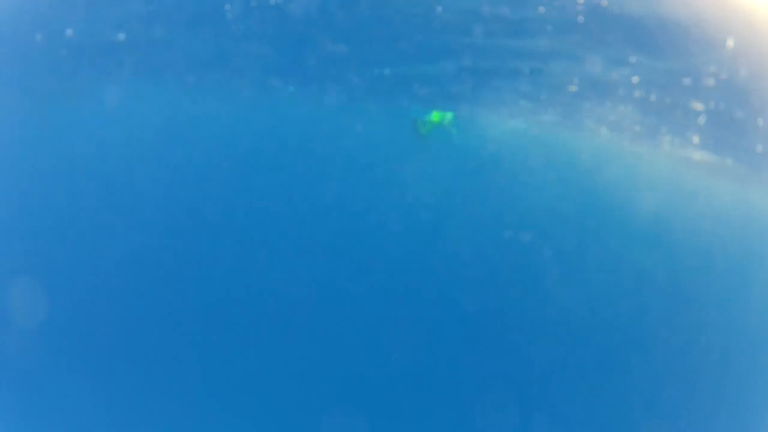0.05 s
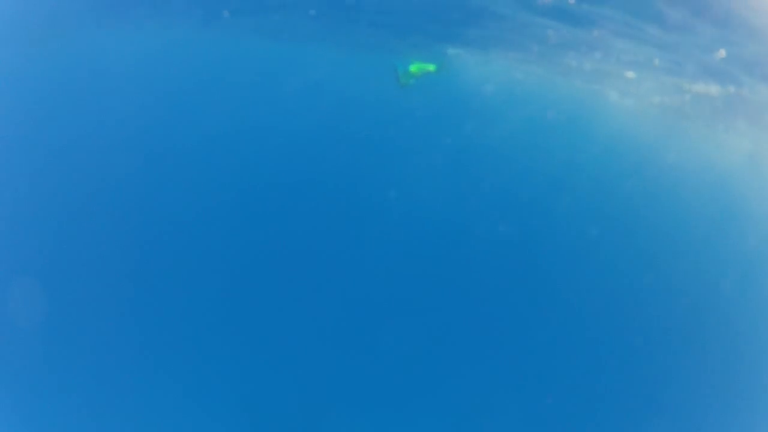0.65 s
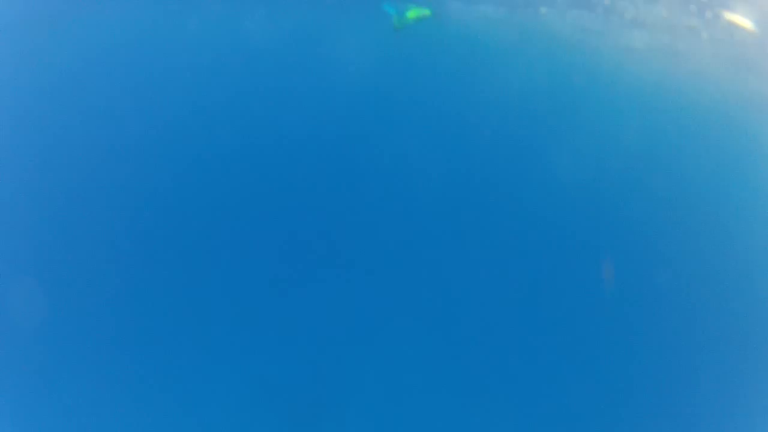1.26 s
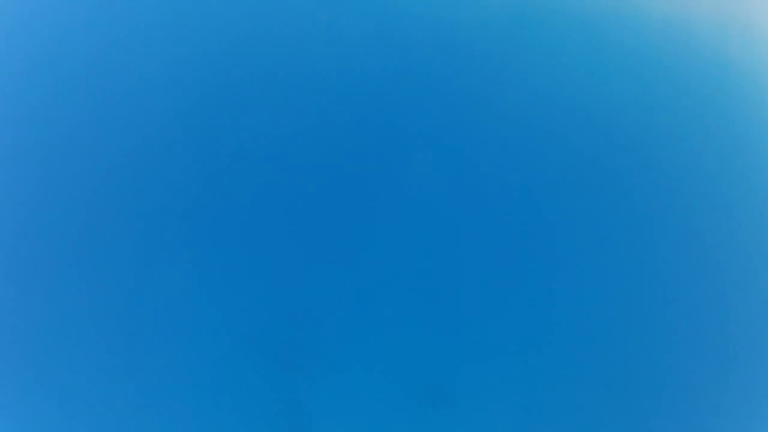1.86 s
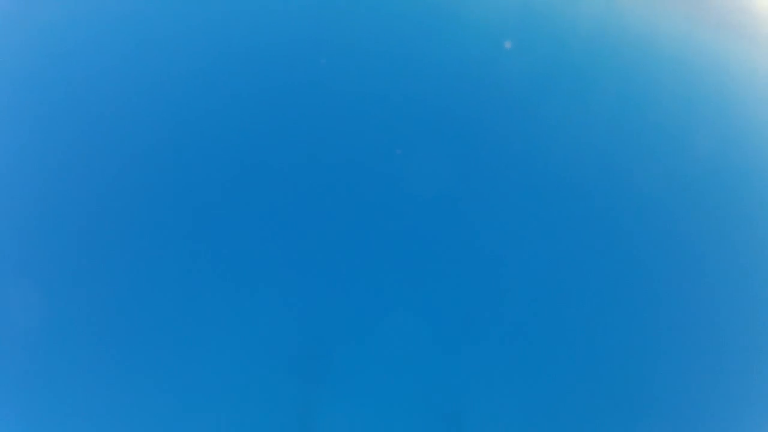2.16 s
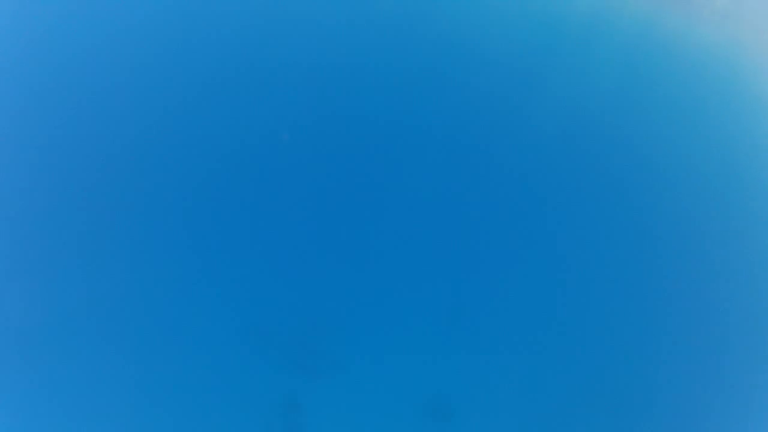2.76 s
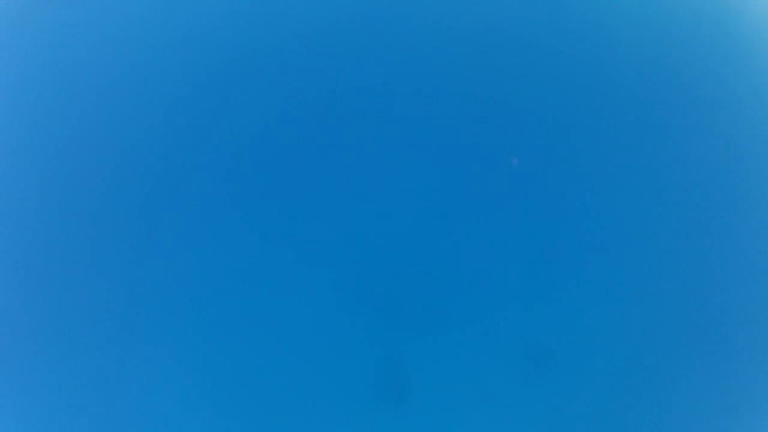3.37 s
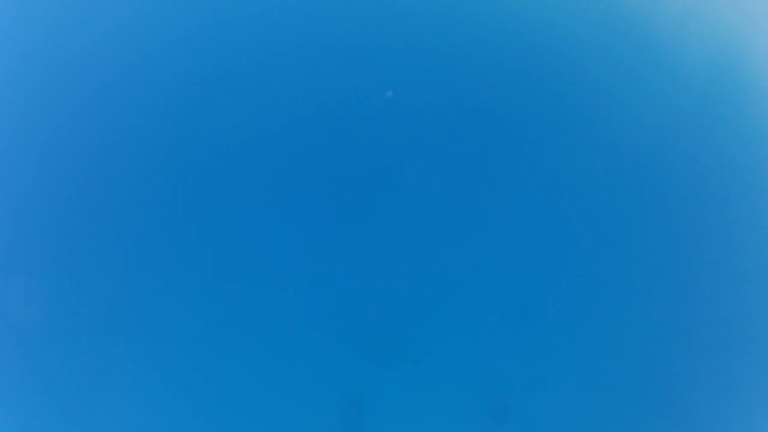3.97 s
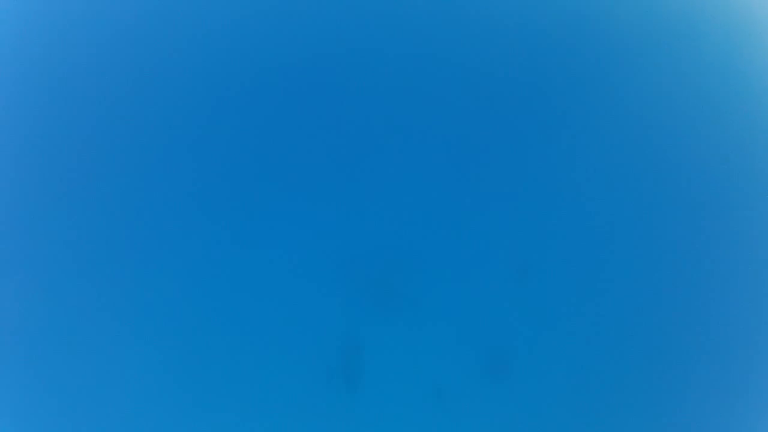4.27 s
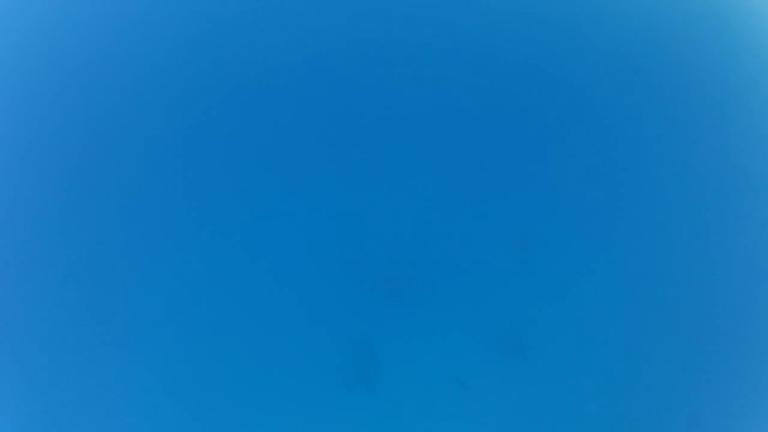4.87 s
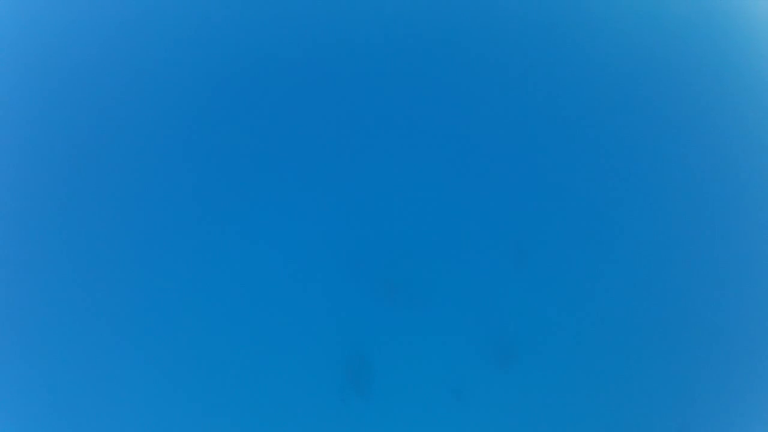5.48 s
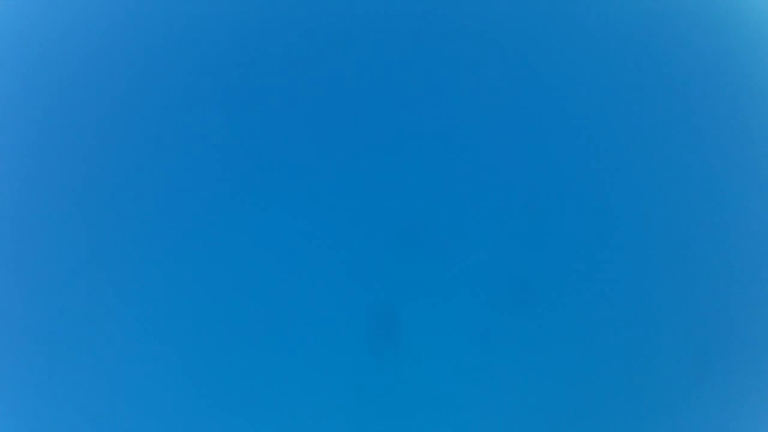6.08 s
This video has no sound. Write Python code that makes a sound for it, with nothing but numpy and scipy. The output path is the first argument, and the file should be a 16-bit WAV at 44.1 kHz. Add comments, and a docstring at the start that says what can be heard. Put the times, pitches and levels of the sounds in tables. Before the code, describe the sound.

Heard from inside a small sealed camera moving under the sea, it opens quietly with a few plinking bubbles and two faint, thin squeaks, probably from a tether. From 0.6 seconds water surges in, a low churning rumble with a hollow ring from the housing, tiny bubble snaps and a cluster of dull thuds at about 1.3 seconds. As it ebbs, light ticks run from 1.6 seconds and crowd into a short creak around 2 seconds. The next surge brings a sharp knock and close glugs at 2.4 to 2.7 seconds. The flow fades, with more ticks near 3.6 seconds, then returns with bubbles and small knocks between 3.8 and 4.4 seconds. From 4.5 seconds the water becomes a brighter, steadier rush, with one short high pip at 4.8, lasting until about 6 seconds. A thin digital sheen colours the treble throughout.

```python
"""A small sealed camera is drawn along under the sea. In an opening lull bubbles plink and the tether,
most likely, squeaks. From 0.6 s surges churn and ring the housing; eddies thud on the shell. As the
first ebbs the tether ticks, then creaks near 2 s as the pull returns. A knock and close glugs come in
the next surge, and more ticks follow its ebb. From 4.5 s the water turns into a brighter rush.
Throughout, the recorder holds each sample, which mirrors the sound into the treble."""
import sys
import numpy as np
from scipy import signal
from scipy.fft import rfft, irfft, next_fast_len
from scipy.io import wavfile
from scipy.ndimage import map_coordinates

SR = 44100
rng = np.random.default_rng(int(sys.argv[2]) if len(sys.argv) > 2 else 0)


def persist_wave(psi):
    """Save psi, clipped to +-1, as 16-bit WAV."""
    counts = np.round(np.clip(psi, -1, 1) * 32767).astype(np.int16)
    wavfile.write(sys.argv[1], SR, np.atleast_2d(counts).T)


N = 270333
TIME = np.arange(N) / SR

# tether squeaks, one curve each: t/s, f/Hz, relative level/dB
SQUEAK_CURVES = [
    [(.047, 1145, -58), (.050, 1145, -48.5), (.062, 1253, -48), (.08, 1264, -57.5), (.105, 1410, -60),
     (.12, 1370, -70)],
    [(.228, 1207, -64), (.238, 1194, -50), (.255, 1306, -52), (.28, 1286, -51), (.297, 1290, -59),
     (.308, 1240, -60)],
]
# squeak spectrum: harmonic number, relative level/dB
SQUEAK_HARMONICS = [(1, -4.5), (2, -1), (3, 4.5), (4, -12.5)]
# tether mount: f/Hz, relative level/dB, t60/s
MOUNT_MODES = [(720, -1.5, 0.024), (1160, -2.5, .013), (1444, -2, 0.012), (1980, -4.5, .009),
               (2610, -7, 0.0071), (3720, -11, 0.0073), (5340, -19.5, 0.0046)]
# runs of tether slips: first level/dB, tilt/(dB/octave), t/s of each slip
SLIP_RUNS = [(-37.5, 0.5, (1.6168, 1.6646, 1.6965, 1.7242, 1.7514, 1.779, 1.809, 1.8432, 1.8826, 1.9422)),
             (-39, -1, (3.5328, 3.576, 3.6187, 3.6522, 3.6925, 3.7293))]
# tether creak: t/s, slip rate/Hz, relative level/dB
CREAK_CURVE = [(1.97, 56, -60), (2.0, 75, -42), (2.06, 130, -42), (2.12, 122, -48), (2.18, 170, -44.5),
               (2.25, 120, -56)]
# collapsing minute bubbles: t/s, f/Hz, level/dB
BUBBLE_SNAPS = [(.7407, 5340, -44.5), (.861, 5100, -39.5), (0.93, 4600, -45), (1.332, 4630, -49),
                (3.7712, 4920, -40), (3.8385, 3700, -47.5), (3.9592, 4570, -34.5)]
# large bubbles: t/s, f/Hz, level/dB
LARGE_BUBBLES = [(0.049, 2240, -42), (.336, 3200, -53.5), (0.386, 1197, -39.5), (0.429, 2320, -47),
                 (0.454, 2707, -50.5), (0.4666, 1804, -37.5), (0.547, 1210, -43.5), (2.389, 1544, -32),
                 (2.426, 2670, -37.5), (2.4312, 1100, -21.5), (2.457, 2030, -33), (2.4545, 1210, -39),
                 (2.468, 3500, -44), (2.48, 2700, -50), (2.607, 1880, -38), (2.6107, 3280, -48),
                 (2.6351, 1172, -30), (2.636, 639, -20.5), (2.668, 2430, -44.5), (2.699, 1530, -45),
                 (3.7712, 2060, -40), (3.785, 2510, -41), (3.789, 1180, -35), (3.802, 1420, -37),
                 (3.8112, 2050, -37.5), (3.962, 2180, -37), (3.9985, 3580, -43), (4.0105, 1900, -35),
                 (4.052, 644, -28.5), (4.213, 1830, -37)]
# swarms of tiny bubbles: t/s, spread/s, typical level/dB
BUBBLE_SWARMS = [(.42, 0.048, -56), (.56, 0.014, -56), (.8, .04, -52), (2.25, .1, -58), (2.465, 0.018, -55),
                 (2.635, 0.033, -51), (3.08, .08, -62), (3.8, 0.016, -61), (4.049, 0.038, -49)]
# short thuds, a sharp knock, a glug and a high pip: t/s, f/Hz, level/dB, rise/s
THUDS_AND_BLIPS = [(1.2855, 430, -21, 0.0019), (1.324, 477, -26.5, 0.0021), (1.334, 277, -22, 0.0017),
                   (1.339, 114, -26.5, 0.0073), (2.154, 218, -29.5, 0.0076), (2.4296, 394, -17, 0.00028),
                   (2.4304, 647, -18.5, 0.0014), (3.802, 610, -32.5, 0.0022), (4.061, 670, -28, 0.0024),
                   (4.351, 464, -28, 0.00098), (4.428, 200, -23, .00067), (4.8194, 1955, -28, 0.0013)]
# surges: full-flow t/s, slackening t/s, first level/dB, last level/dB
FLOW_SURGES = [(-.1, 0.007, -47, -49), (0.556, 1.471, -40.5, -39.5), (2.165, 3.384, -42.5, -52),
               (3.872, 4.552, -42, -39.5), (4.8, 6.13, -46, -45)]
# rumble swells and dips from passing eddies: t/s, half-width/s, gain/dB
EDDY_SWELLS = [(.88, 0.11, 6), (1.32, .11, 7.5), (1.75, 0.17, 9.5), (3.05, 0.17, 8), (4.05, 0.26, -3.5),
               (4.58, 0.066, 5), (5.36, 0.084, -27)]
# fast rush: t/s, level/dB
RUSH_CURVE = [(0, -59.5), (3.7, -56.5), (4.28, -59.5), (4.5, -46), (5.2, -43), (6.13, -42)]
# water noise spectra: f/Hz, relative density/dB
SWAY_SPECTRUM = [(10, -26), (24, -17), (31, 7.5), (38, 7), (46, 8), (56, -19), (75, -0.5), (120, -23),
                 (400, -38.5)]
BUFFET_SPECTRUM = [(35, -9), (62, -7.5), (90, -2), (110, 3.5), (128, 4.5), (160, -6), (220, -14.5),
                   (500, -63)]
CHURN_SPECTRUM = [(60, -26), (130, -7), (175, -0.5), (245, 1), (300, -2.5), (400, -2.5), (470, -2.5),
                  (550, -1.5), (690, -11), (1000, -44), (3000, -60)]
HISS_SPECTRUM = [(100, 17.5), (800, -6.5), (1100, -25), (2000, 9), (3000, -11.5), (4000, -4.5), (5900, -30)]
# housing modes in slow and fast flow: f/Hz, half-width/Hz, relative level/dB
SLOW_FLOW_MODES = [(599.7, 31, 4), (858, 30, -23), (1050, 44, -30.5), (1215, 47, -23.5), (1504, 48, -27.5),
                   (1788, 49, -17.5), (1900, 133, -24.5), (2480, 170, -41.5), (3580, 450, -47.5)]
FAST_FLOW_MODES = [(342, 35, 3), (510, 86, 3), (655, 49, 6.5), (795, 56, 2), (1195, 66, -6.5),
                   (1555, 31, -15), (2014, 150, -9), (2545, 200, -16.5), (3544, 380, -20), (4930, 640, -29)]


def amp(db):
    """Decibels to gain."""
    return 10 ** (np.asarray(db) / 20)


def unit(x):
    """Scale to rms 1."""
    return x / np.sqrt(np.mean(x ** 2) + 1e-20)


def curves(rows):
    """Per-sample values of each column after the time."""
    times_s, *columns = np.transpose(rows)
    return [np.interp(TIME, times_s, column) for column in columns]


def during(rows):
    """True between a curve's first and last row."""
    return (TIME > rows[0][0]) & (TIME < rows[-1][0])


def wobble(rate_hz):
    """Smooth random curve, knots at rate_hz."""
    return map_coordinates(rng.standard_normal(int(N * rate_hz / SR) + 4), [TIME * rate_hz])


def colour(points):
    """Response through (f/Hz, level/dB) points, log frequency axis."""
    knots_hz, db = np.transpose(points)
    return lambda hz: amp(np.interp(np.log(hz + 1), np.log(knots_hz), db))


def resonances(modes):
    """Response of steep-sided modes, summed in power."""
    return lambda hz: np.sqrt(sum((amp(db) / (1 + ((hz - centre_hz) / width_hz) ** 2)) ** 2
                                  for centre_hz, width_hz, db in modes))


def filtered(x, response):
    """Apply a frequency response."""
    size = next_fast_len(N + SR // 2)
    return irfft(rfft(x, size) * response(np.fft.rfftfreq(size, 1 / SR)), size)[:N]


def add(track, at_s, sound):
    """Mix a sound into a track."""
    part = track[max(round(at_s * SR), 0):][:len(sound)]
    part += sound[:len(part)]


def squeaks(chatter_hz=225, chatter_depth=0.61, jitter=0.014, rasp_rad=0.78):
    """Very fast stick-slip: a thin, rasping tone chopped by slower chatter."""
    track = np.zeros(N)
    for rows in SQUEAK_CURVES:
        hz, db = curves(rows)
        phase = 2 * np.pi * np.cumsum(hz * (1 + jitter * wobble(600))) / SR
        # uneven grip smears each harmonic separately
        tone = sum(amp(harmonic_db) * np.sin(k * phase + rasp_rad * wobble(900))
                   for k, harmonic_db in SQUEAK_HARMONICS)
        chatter_phase = 2 * np.pi * np.cumsum(chatter_hz * (1 + 0.052 * wobble(45))) / SR
        chatter = 1 + chatter_depth * np.sin(chatter_phase)
        track += amp(db - 5) * during(rows) * chatter * unit(tone)
    return track


def slip(db, tilt_db_per_oct, vary_db=1.5, detune=0.026, rebound=0.77, rebound_s=0.00183):
    """A tether jerk rings the mount at random mode strengths, then rebounds once."""
    t = np.arange(SR // 30) / SR
    hz, mode_db, t60_s = np.transpose(MOUNT_MODES)[:, :, None]
    mode_db = mode_db + tilt_db_per_oct * np.log2(hz / 1500) + vary_db * rng.standard_normal(hz.shape)
    phase = 2 * np.pi * hz * (1 + detune * rng.standard_normal(hz.shape)) * t
    sign = (-1) ** np.arange(len(MOUNT_MODES))[:, None]  # opposed neighbours: one dry, broad click
    ring = amp(db) * np.sum(sign * amp(mode_db - 60 * t / t60_s) * np.sin(phase), 0)
    delay_s = rebound_s * rng.uniform(0.494, 1.5)
    return ring + rebound * np.interp(t - delay_s, t, ring, left=0)


def ticks(fade_db_per_doubling=2.5):
    """Single slips as the flow ebbs, weakening with their count."""
    track = np.zeros(N)
    for first_db, tilt_db_per_oct, times_s in SLIP_RUNS:
        for count, at_s in enumerate(times_s, 1):
            add(track, at_s, slip(first_db - fade_db_per_doubling * np.log2(count), tilt_db_per_oct))
    return track


def creak():
    """Light slips crowd together as the pull returns."""
    track = np.zeros(N)
    rate_hz, db = curves(CREAK_CURVE)
    slip_count = np.cumsum(rate_hz * amp(0.75 * wobble(50)) * during(CREAK_CURVE)) / SR
    for sample in np.flatnonzero(np.diff(np.floor(slip_count))):
        add(track, sample / SR, slip(db[sample] - 9.5, tilt_db_per_oct=6.0, rebound=0.3))
    return track


def bubble(hz, db, t60_s, glide=0.036, attack_cycles=0.41, tear_db=-11, tear_s=0.0021):
    """The neck tears with a noise burst; the bubble rings, pitch creeping up."""
    t = np.arange(SR // 6) / SR
    cycles = hz * (t + glide * t ** 2 / (2 * t60_s))
    ring = amp(-60 * t / t60_s) * (1 - np.exp(-cycles / attack_cycles)) * np.sin(2 * np.pi * cycles)
    band = signal.butter(2, [0.45 * hz, 1.2 * hz], "band", fs=SR, output="sos")
    tear = unit(signal.sosfilt(band, rng.standard_normal(len(t))))
    return amp(db) * (ring + amp(tear_db) * tear * np.exp(-t / tear_s))


def snaps():
    """Minute bubbles collapse: high clicks, hardly any ring."""
    track = np.zeros(N)
    for at_s, hz, db in BUBBLE_SNAPS:
        add(track, at_s, bubble(hz, db, t60_s=0.0076))
    return track


def bubbles(swarm_hz=2600, scatter=0.324, max_hz=4200, t60_cycles=40, per_swarm=16):
    """Large single bubbles and swarms of tiny ones; lower ones ring longer."""
    track = np.zeros(N)
    for at_s, hz, db in LARGE_BUBBLES:
        add(track, at_s, bubble(hz, db, t60_s=0.078 * (hz / 1000) ** -0.94))
    for at_s, spread_s, db in BUBBLE_SWARMS:
        for offset, pitch, strength in rng.standard_normal((per_swarm, 3)):
            hz = min(swarm_hz * np.exp(scatter * pitch), max_hz)
            add(track, at_s + spread_s * offset, bubble(hz, db + 2 * strength, t60_cycles / hz))
    return track


def thuds_and_blips():
    """Short thuds, a sharp knock, a glug and a high pip: tones that swell and die quickly."""
    track = np.zeros(N)
    t = np.arange(SR // 10) / SR
    for at_s, hz, db, rise_s in THUDS_AND_BLIPS:
        envelope = t / rise_s * np.exp(1 - t / rise_s)
        add(track, at_s, -amp(db) * envelope * np.sin(2 * np.pi * hz * t))
    return track


def turbulence(response, lump_db, lump_hz):
    """Lumpy noise driving a response; rms 1."""
    drive = rng.standard_normal(N) * amp(lump_db * wobble(lump_hz))
    return unit(filtered(drive, response))


def surges_db(rise_db_per_s=96, ebb_db_per_s=36.5, lull_db=-66.0):
    """Flow level: each surge builds fast, holds with a drift, ebbs slowly."""
    flow_db = np.full(N, lull_db)
    for full_s, slack_s, first_db, last_db in FLOW_SURGES:
        held_db = np.interp(TIME, [full_s, slack_s], [first_db, last_db])
        rise_db = rise_db_per_s * np.minimum(TIME - full_s, 0)
        ebb_db = ebb_db_per_s * np.maximum(TIME - slack_s, 0)
        flow_db = np.maximum(flow_db, held_db + rise_db - ebb_db)
    return flow_db


def water(buffet_db=-4.5, churn_db=-3, churn_swell_share=0.41, ring_db=0.5, sway_db=-55.5, hiss_db=-59):
    """Flow buffets, churns and rings the housing, with slow sway, a late rush and faint hiss."""
    flow_db = surges_db()
    swell_db = sum(db * np.exp(-((TIME - at_s) / width_s) ** 2) for at_s, width_s, db in EDDY_SWELLS)
    rush_db, = curves(RUSH_CURVE)
    buffet_gain = amp(flow_db + buffet_db + swell_db)
    churn_gain = amp(flow_db + churn_db + churn_swell_share * swell_db)
    sway = amp(sway_db) * unit(filtered(rng.standard_normal(N), colour(SWAY_SPECTRUM)))
    buffet = buffet_gain * turbulence(colour(BUFFET_SPECTRUM), lump_db=0.8, lump_hz=79)
    churn = churn_gain * turbulence(colour(CHURN_SPECTRUM), lump_db=2.0, lump_hz=150)
    ring = amp(flow_db + ring_db) * turbulence(resonances(SLOW_FLOW_MODES), lump_db=1.0, lump_hz=150)
    rush = amp(rush_db) * turbulence(resonances(FAST_FLOW_MODES), lump_db=2.0, lump_hz=350)
    hiss = amp(hiss_db) * turbulence(colour(HISS_SPECTRUM), lump_db=3.5, lump_hz=130)
    return sway + buffet + churn + ring + rush + hiss


def scene():
    """All sources at one microphone inside the housing."""
    return (water() + bubbles() + snaps() + thuds_and_blips() + ticks() + creak() + squeaks())[None]


def record(dry, hold_hz=12000, top_hz=15600, mirror_db=0.53):
    """Sample-and-hold mirrors the band about the hold rate, weakest right beside it."""
    band = filtered(dry[0], lambda hz: 1 / np.sqrt(1 + (hz / (0.48 * hold_hz)) ** 60))
    sidebands = band * 2 * np.cos(2 * np.pi * hold_hz * TIME)
    mirror = filtered(sidebands, lambda hz: (hold_hz - hz) / np.maximum(hz, hold_hz / 2))
    return filtered(band + amp(mirror_db) * mirror, lambda hz: hz < top_hz)[None]


dry = scene()
out = record(dry)
persist_wave(out)
```